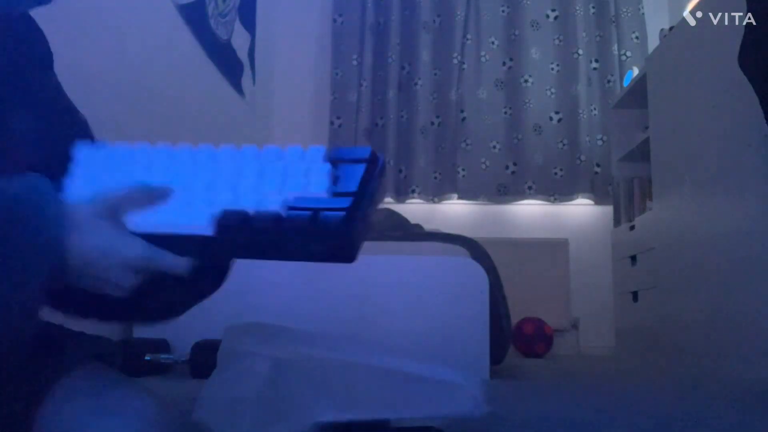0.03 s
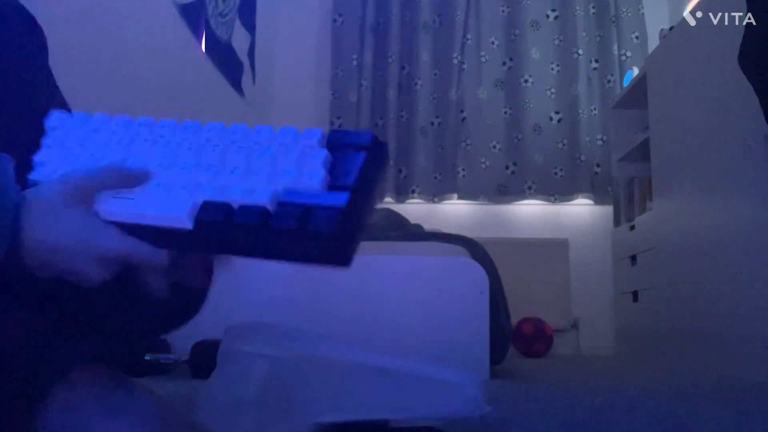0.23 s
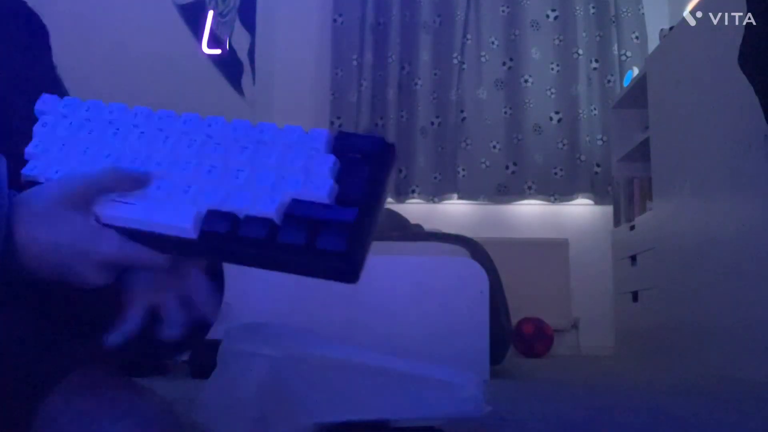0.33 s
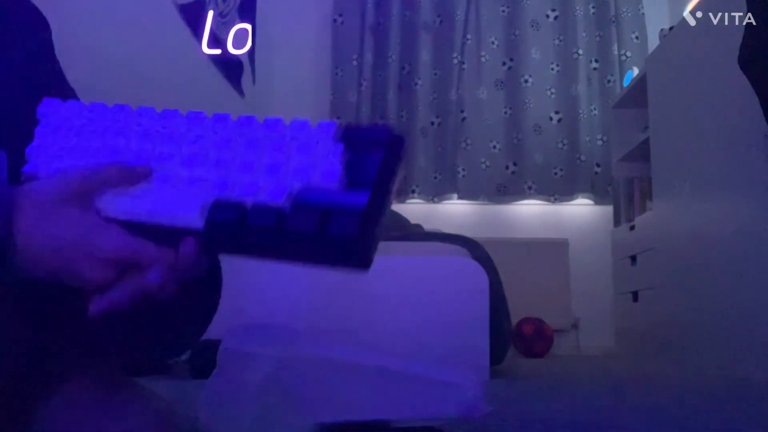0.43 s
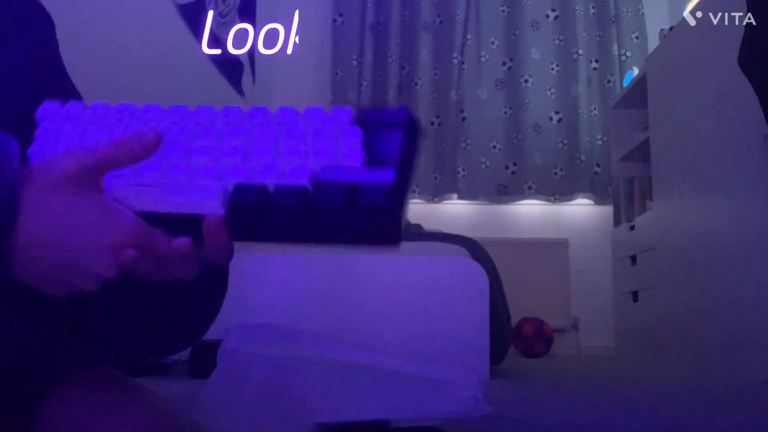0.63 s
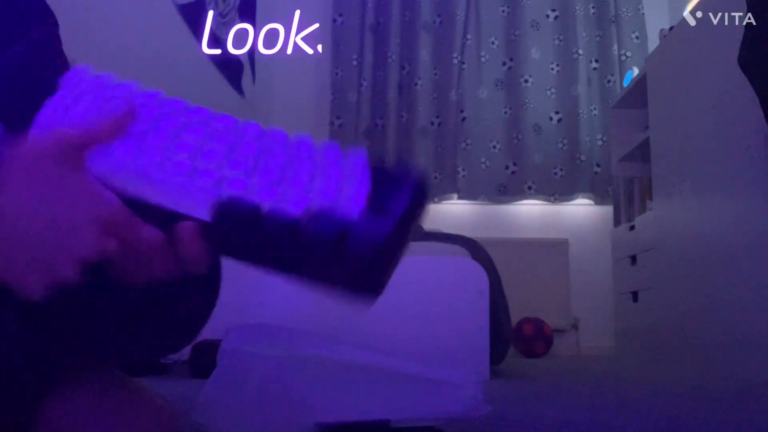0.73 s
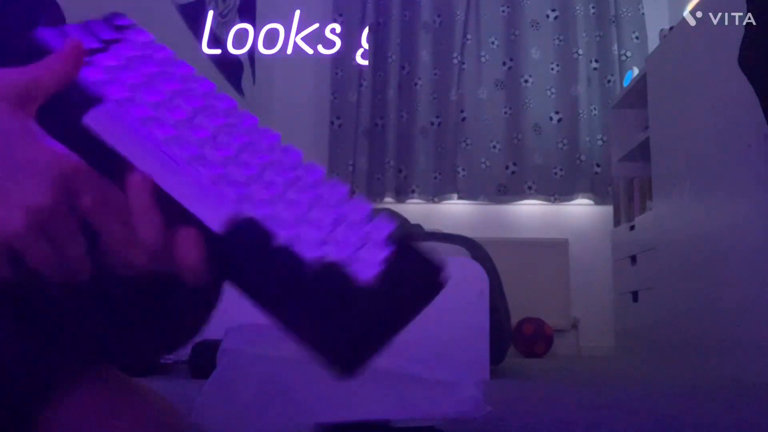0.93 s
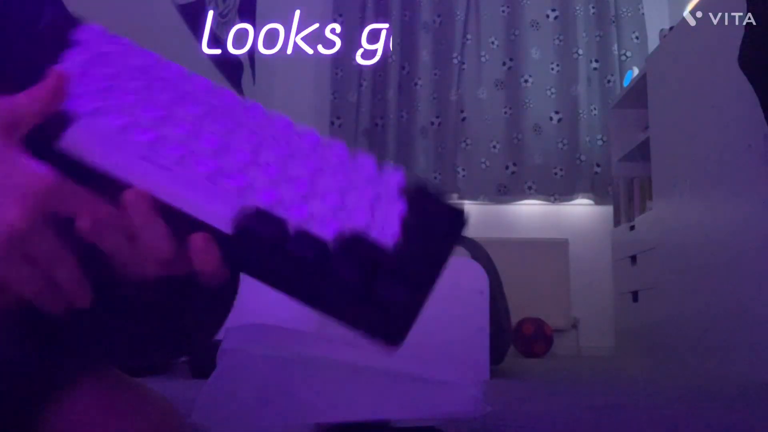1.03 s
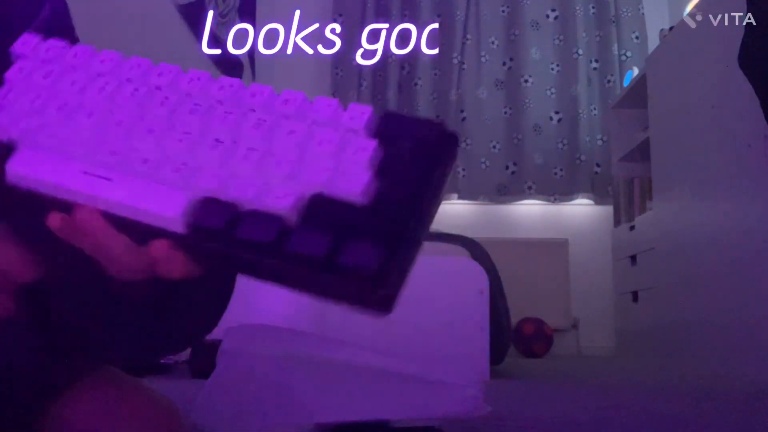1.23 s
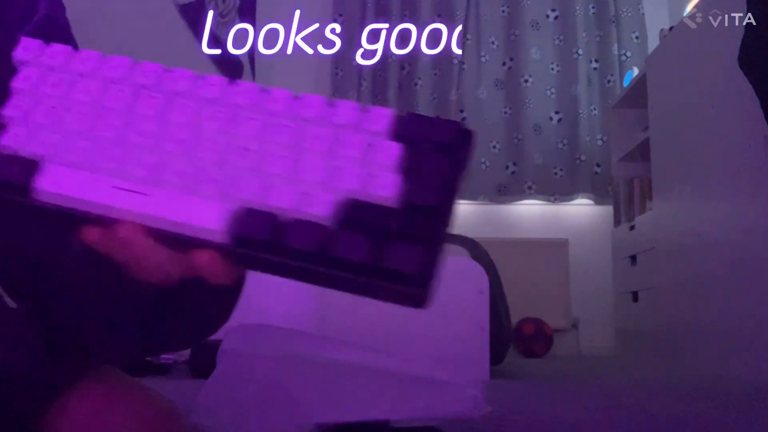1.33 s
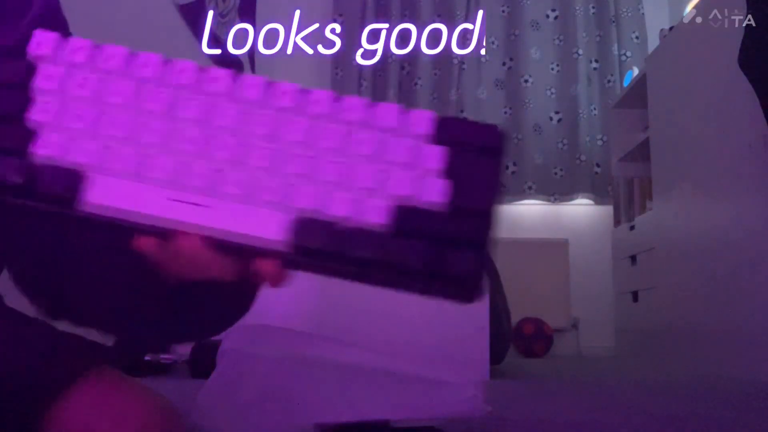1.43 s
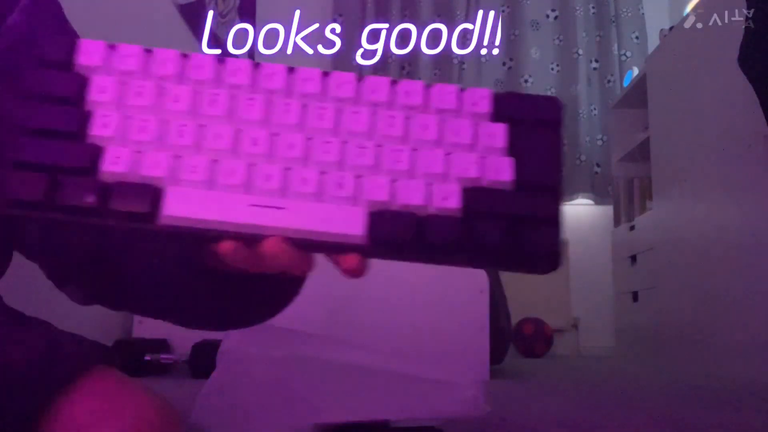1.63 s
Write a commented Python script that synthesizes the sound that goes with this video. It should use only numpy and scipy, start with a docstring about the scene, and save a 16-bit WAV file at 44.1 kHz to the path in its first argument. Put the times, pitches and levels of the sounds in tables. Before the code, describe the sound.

A small plastic keyboard is lifted and tilted by hand in a quiet bedroom. A hollow bump and light keycap ticks come first, then a faint sliding rustle, then a quick cluster of softer bumps, near the microphone.

```python
"""Hollow bumps, light ticks and a faint rustle: a small plastic keyboard lifted and tilted by hand.
A quiet bedroom, one microphone, near enough to catch the fingers. Hands bump the case and set the
room booming, keycaps tick and rattle under the fingers, and the case slides against skin and
sleeve as it turns."""
import sys
import numpy as np
from scipy import signal
from scipy.fft import rfft, irfft
from scipy.io import wavfile

SR = 44100
rng = np.random.default_rng(int(sys.argv[2]) if len(sys.argv) > 2 else 0)


def file_out(sig):
    """Save sig as 16-bit WAV at sys.argv[1]."""
    # one column per channel
    cols = np.atleast_2d(sig).T
    # limit, then scale
    lim = np.clip(cols, -1, 1)
    pcm = np.round(lim * 32767).astype(np.int16)
    wavfile.write(sys.argv[1], SR, pcm)


N = 74970
TIME = np.arange(N) / SR

# Keycaps and fingers ticking on plastic: (time [s], attack [s], decay time constant [s],
# level in each of the five TICK_BANDS [dB], ring pitch [Hz], ring level [dB])
KEY_TICKS = [(0.003, 0.0046, 0.039, -59, -83, -78, -75, -76, 548, -46.5),
             (0.025, 0.00052, 0.001, -46.5, -91, -60, -80, -88, 3840, -74),
             (0.073, 0.000067, 0.0011, -51.5, -51, -60, -60, -66, 490, -66),
             (0.0762, 0.0009, 0.0015, -30.5, -35.5, -49.5, -79, -60.5, 740, -56),
             (0.178, 0.017, 0.021, -60, -63, -85, -73, -83, 1410, -79),
             (0.2154, 0.00093, 0.0083, -44.5, -58, -56, -62.5, -58.5, 3946, -56.5),
             (0.2259, 0.00014, 0.0013, -42.5, -49, -52, -49.5, -48.5, 5700, -63),
             (0.229, 0.00077, 0.006, -43, -50, -60.5, -75, -73, 1470, -63),
             (0.369, .005, 0.014, -52, -57.5, -59, -69.5, -93, 1450, -68),
             (0.3888, 0.0014, 0.007, -49, -53.5, -56.5, -62.5, -81, 2305, -51),
             (0.4233, 0.00023, 0.002, -71, -62, -54.5, -51.5, -52, 7000, -69),
             (0.430, 0.004, 0.0051, -47.5, -53, -48.5, -54, -57, 3195, -50.5),
             (0.442, .001, 0.0039, -72, -76, -51, -51, -53, 4170, -53),
             (0.469, 0.0004, 0.0065, -73, -82, -65, -71, -73, 3050, -66),
             (0.5078, 0.00029, 0.0045, -66, -73, -57, -60, -64, 6750, -55),
             (0.522, 0.0013, 0.001, -85, -60, -54, -77, -78, 2900, -61),
             (0.583, 0.00054, 0.0079, -54.5, -64.5, -69.5, -85, -80, 744, -56.5),
             (0.628, 0.0019, 0.0033, -52, -61, -79, -83, -83, 964, -75),
             (0.855, 0.0021, 0.006, -55, -57.5, -63.5, -65, -79, 1710, -69),
             (0.931, .002, 0.0045, -59, -64, -62, -63, -74, 3600, -75),
             (1.1714, 0.0017, 0.0035, -56, -55.5, -51, -52.5, -48.5, 3350, -60),
             (1.2738, 0.0005, 0.011, -73.5, -89, -70, -78, -88, 4480, -66.5),
             (1.3015, 0.00018, 0.0028, -77, -60, -53.5, -62, -64, 4150, -59),
             (1.365, 0.00042, 0.021, -62.5, -54.5, -65.5, -74.5, -71.5, 1696, -59.5),
             (1.543, 0.0081, 0.064, -72.5, -75, -76, -91, -83, 3400, -64)]
# Frequency bands of a tick: (low edge [Hz], high edge [Hz])
TICK_BANDS = [(450, 1066), (1150, 2425), (2400, 4120), (5150, 9000), (9200, 14500)]


def from_db(db):
    """Decibels to gain."""
    return 10 ** (np.asarray(db) / 20)


def level(curve):
    """Gain over time from (time [s], level [dB]) points."""
    return from_db(np.interp(TIME, *np.transpose(curve)))


def coloured(x, spectrum):
    """Shape a steady signal by (frequency [Hz], relative level [dB]) points; rms 1."""
    hz, db = np.transpose(spectrum)
    bins_hz = np.maximum(np.arange(N // 2 + 1) * SR / N, 1)
    gain = from_db(np.interp(np.log(bins_hz), np.log(hz), db))
    shaped = irfft(rfft(x) * gain, N)
    return shaped / np.sqrt(np.mean(shaped ** 2) + 1e-20)


def noise(spectrum):
    """Coloured noise; rms 1."""
    return coloured(rng.standard_normal(N), spectrum)


def since(start):
    """Seconds since a start, zero before it."""
    return np.maximum(TIME - start, 0)


def swell_and_die(t, swell, t60):
    """Envelope that builds up, then decays by 60 dB in t60 seconds."""
    return (1 - np.exp(-t / swell)) * np.exp(-np.log(1000) * t / t60)


def room_tone():
    """The bedroom's faint, steady background, mostly low rumble."""
    # Background spectrum: (frequency [Hz], relative level [dB])
    colour = [(20, -6), (45, 6), (85, 17.5), (140, 0.5), (300, 0.5), (560, 3), (900, -8), (1600, -8),
              (3000, -11), (6000, -11.5), (12000, -13.5), (16000, -14.5)]
    return from_db(-73) * noise(colour)


def case_slide():
    """The turning case rubs on skin and sleeve with a smooth hiss."""
    # Rise and fall of the slide: (time [s], level [dB])
    loudness = [(0, -84), (0.40, -81), (0.50, -71.5), (0.60, -66.5), (0.70, -65.5), (0.80, -66.5),
                (0.90, -62.5), (1.0, -67), (1.07, -74), (1.14, -86.5), (1.7, -100)]
    # Friction spectrum: (frequency [Hz], relative level [dB])
    colour = [(200, -2.5), (420, 5.5), (550, 14), (700, 4), (950, -12), (1500, -17), (1750, -0.5),
              (2100, -12), (4800, -12), (5400, -2.5), (5700, 0), (5980, -8.5), (6230, 6), (6550, -9),
              (6930, 2.5), (7350, -3), (7800, 0.5), (9300, -16.5), (10800, -8), (11800, 3), (12700, -16),
              (14000, -7), (16000, -18)]
    return level(loudness) * noise(colour)


def finger_grip():
    """Fingers shifting their grip make a dense run of tiny friction grains."""
    # Shifts of grip: (time [s], level [dB])
    loudness = [(0, -69), (0.05, -70), (0.16, -109), (0.2, -73.5), (0.3, -82), (0.78, -86), (0.84, -68),
                (0.92, -73.5), (0.97, -86), (1.5, -74), (1.58, -72), (1.7, -90)]
    # Grain spectrum: (frequency [Hz], relative level [dB])
    colour = [(30, -15), (100, 12.5), (500, 4), (1700, 2.5), (3500, -6), (6000, -15.5), (15000, -47)]
    grains_per_s, spread_db = 4000, 2
    grains = (rng.random(N) < grains_per_s / SR) * rng.choice([-1, 1], N)
    strength = from_db(spread_db * np.minimum(rng.exponential(1, N), 4))
    return level(loudness) * coloured(grains * strength, colour)


def plastic(x):
    """Case and keycaps colour a sound with their resonances."""
    # Peaks and dips of the plastic: (frequency [Hz], width [Hz], gain [dB])
    resonances = [(514, 42, 12), (680, 46, 6.5), (1457, 340, 5.5), (1700, 134, 5.5), (2960, 1200, 1),
                  (3700, 130, -6), (7300, 1630, -0.5), (14100, 1400, 1.5)]
    for hz, width, gain_db in resonances:
        b, a = signal.iirpeak(hz, hz / width, fs=SR)
        x = x + (from_db(gain_db) - 1) * signal.lfilter(b, a, x)
    return x


def keycap_ticks():
    """Each tick reaches the microphone as a brief chatter of plastic, followed by the room's tail."""
    # Room tail against the direct tick, by band: (energy [dB])
    room_db = [-1, 0, -3.5, 2, -5]
    # Room decay, by band: (t60 [s])
    room_t60 = [0.22, 0.24, 0.21, 0.11, 0.22]
    out = np.zeros(N)
    for k, band in enumerate(TICK_BANDS):
        power = np.zeros(N)
        for start, attack, decay, *band_db, _, _ in KEY_TICKS:
            t = since(start)
            direct = swell_and_die(t, attack, decay * np.log(1000)) ** 2
            tail = swell_and_die(t, swell=0.0013, t60=room_t60[k]) ** 2
            tail *= from_db(room_db[k]) ** 2 * direct.sum() / tail.sum()
            power += from_db(band_db[k]) ** 2 * (direct + tail)
        bandpass = signal.butter(3, band, "band", fs=SR, output="sos")
        chatter = rng.choice([-1., 1.], N)
        steady_rms = np.std(plastic(signal.sosfilt(bandpass, chatter)))
        out += plastic(signal.sosfilt(bandpass, chatter * np.sqrt(power) + 1e-18)) / steady_rms
    return out


def keycap_pings():
    """The part that each tick touches snaps for a few cycles, then rings briefly at its own pitch."""
    snap_lift_db, snap_cycles = 1, 1.74
    centres_hz = np.mean(TICK_BANDS, axis=1)
    out = np.zeros(N)
    for start, attack, _, *band_db, hz, ring_db in KEY_TICKS:
        t = since(start)
        snap_db = np.interp(hz, centres_hz, band_db) + snap_lift_db
        snap = from_db(snap_db) * swell_and_die(t, attack, t60=np.log(1000) * snap_cycles / hz)
        ring = from_db(ring_db) * swell_and_die(t, attack, t60=0.056)
        out += np.sin(2 * np.pi * hz * t) * (snap + ring)
    return out


def case_bumps():
    """Each bump rings the low modes of case and room; a softer contact loses the upper ones."""
    # Hands on the case: (time [s], gain [dB], contact cut-off [Hz], gain of the two deepest modes [dB])
    contacts = [(0.028, -55.5, 307, 8.5), (0.2256, -28, 700, 1), (0.406, -54.5, 110, 3),
                (0.73, -63, 233, 9), (0.869, -59.5, 169.3, 8), (0.915, -57.5, 185, -9),
                (1.3033, -42, 400, -3.5), (1.3679, -35, 523, 0), (1.3954, -43.5, 490, -0.5),
                (1.454, -58.5, 106, 8)]
    # Case and room modes; the two deepest beat: (frequency [Hz], relative level [dB], t60 [s], swell [s])
    modes = [(83.18, -1, 0.35, 0.023), (92.4, -2.5, 0.34, 0.0088), (149.45, -10.5, 0.41, 0.0013),
             (174.2, -10, 0.44, 0.0065), (204.3, -6, 0.2, 0.00067), (225.9, -10.5, 0.3, 0.0036),
             (262.6, -7, 0.33, 0.0024), (289.5, -6, 0.25, 0.0011), (335.5, -9, 0.23, 0.00071),
             (416.4, -5, 0.068, 0.00038), (506, -6, 0.086, 0.00041)]
    # Diffuse body of a bump: (frequency [Hz], relative level [dB])
    thud_colour = [(30, -19), (45, 11), (58, 1), (130, 2.5), (300, -6), (480, -9), (620, -13),
                   (1000, -18.5), (2000, -15), (5000, -77)]
    knock_hz, knock_db, knock_t60_s = 298.2, 2.5, 0.06  # the hollow case's own short note
    out = np.zeros(N)
    for start, db, contact_hz, deep_db in contacts:
        t = since(start)
        thud = from_db(-7.5) * noise(thud_colour) * swell_and_die(t, swell=0.0027, t60=0.41)
        knock = np.exp(-np.log(1000) * t / knock_t60_s) * np.sin(2 * np.pi * knock_hz * t)
        hit = thud + from_db(knock_db) * knock
        for k, (hz, mode_db, t60, swell) in enumerate(modes):
            gain = (-1) ** k * from_db(mode_db + deep_db * (k < 2) + rng.normal(0, 1))
            hit += gain * np.sin(2 * np.pi * hz * t) * swell_and_die(t, swell, t60)
        soft_contact = signal.butter(2, contact_hz, fs=SR, output="sos")
        out += from_db(db) * signal.sosfilt(soft_contact, hit + 1e-18)
    return out


def scene():
    """The handled keyboard over the room tone, in mono."""
    keyboard = case_bumps() + keycap_ticks() + keycap_pings() + finger_grip() + case_slide()
    return (keyboard + room_tone())[None]


def record(dry):
    """The microphone drops the deepest rumble; the top is cut steeply."""
    low_cut_hz, high_cut_hz = 51, 16100
    low_cut = signal.butter(4, low_cut_hz, "high", fs=SR, output="sos")
    high_cut = signal.ellip(10, .3, 70, high_cut_hz, fs=SR, output="sos")
    return signal.sosfilt(high_cut, signal.sosfilt(low_cut, dry))


dry = scene()
out = record(dry)
file_out(out)
```